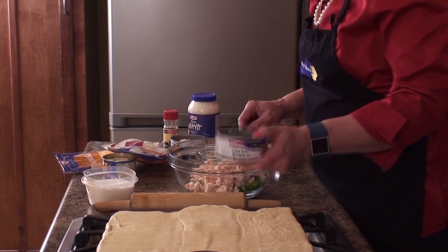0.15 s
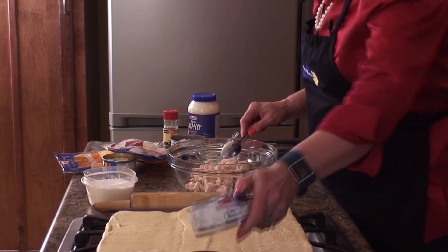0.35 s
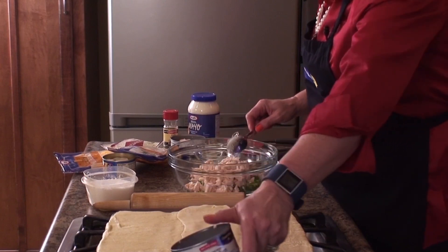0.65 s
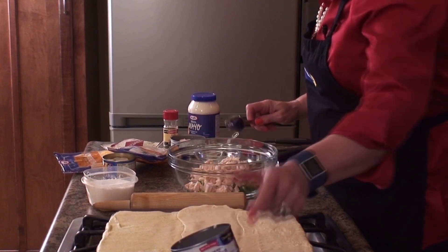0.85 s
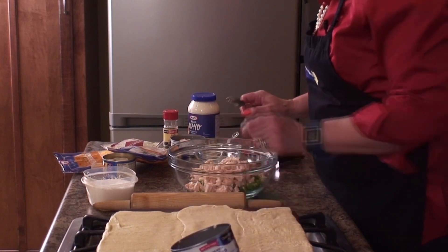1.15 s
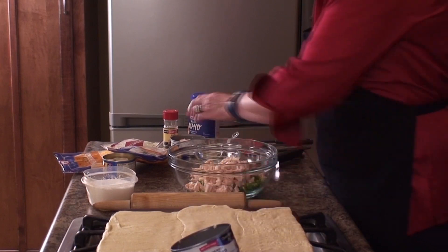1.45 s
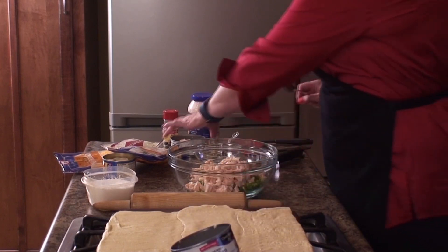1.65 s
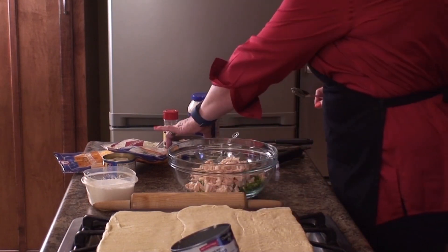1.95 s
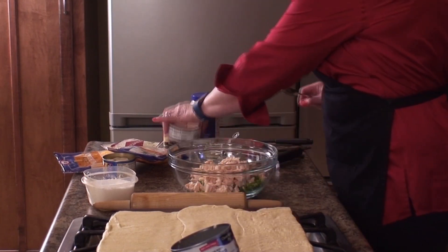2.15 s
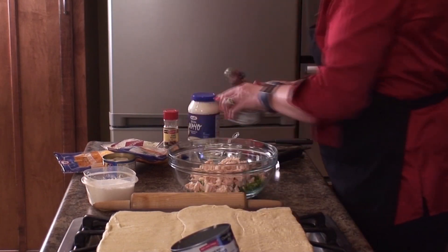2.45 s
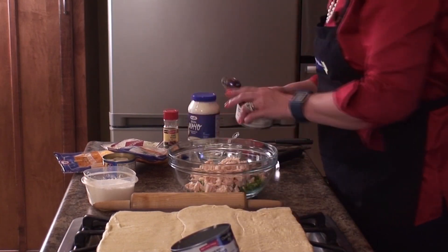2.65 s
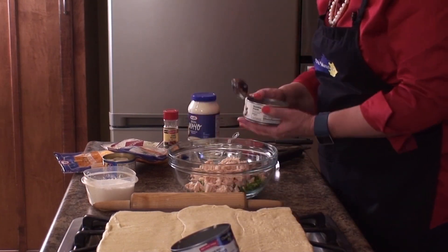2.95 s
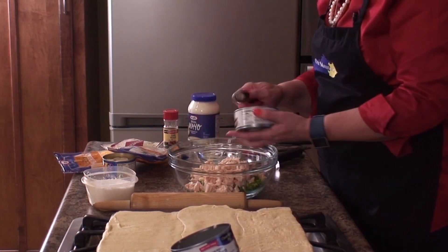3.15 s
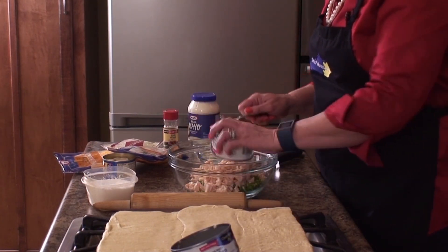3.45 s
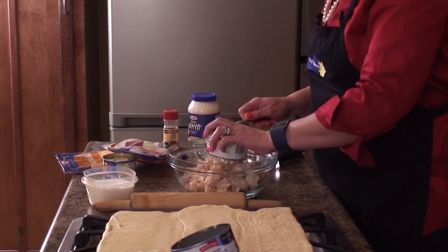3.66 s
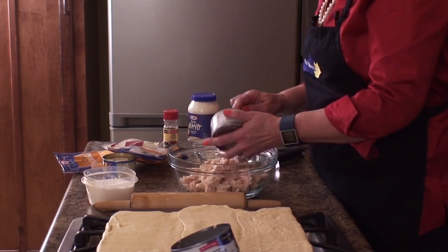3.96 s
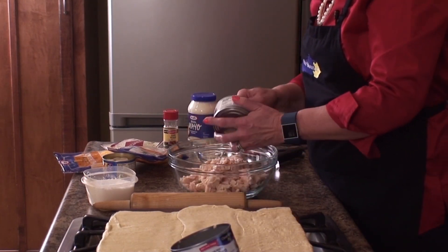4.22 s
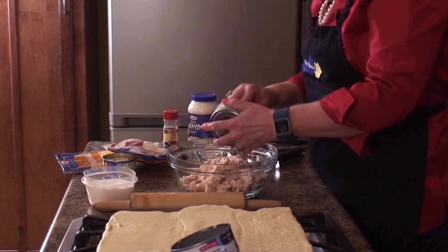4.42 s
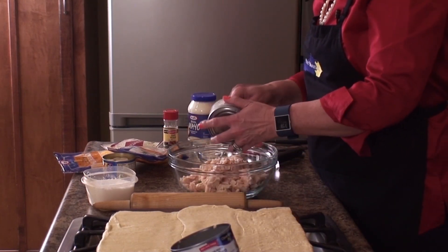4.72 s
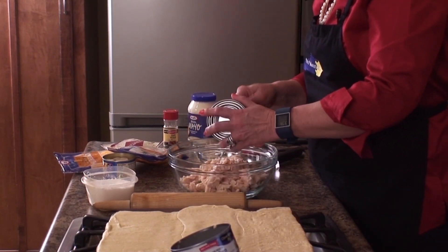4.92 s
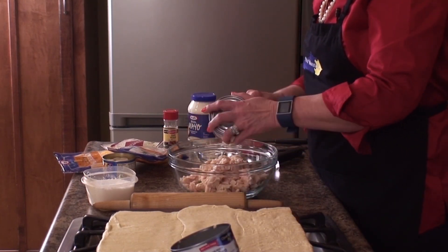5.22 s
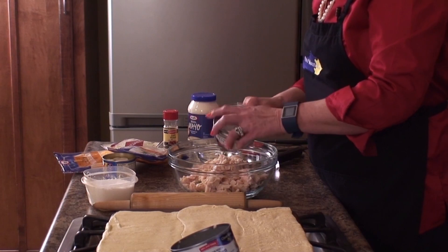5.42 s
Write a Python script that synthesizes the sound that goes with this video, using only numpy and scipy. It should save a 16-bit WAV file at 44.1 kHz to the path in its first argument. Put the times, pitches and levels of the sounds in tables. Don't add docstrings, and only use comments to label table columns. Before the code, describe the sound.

A quiet home kitchen, low unsteady fridge hum and rumble, microphone an arm's length from a stone counter. Barely audible handling ticks and a soft bump come first. At 0.57 s an empty tin is laid down, rocks on its rim in quick uneven clanks until 0.77 s, and leaves a thin fading ring. Dull body bumps against the cupboard occur around 1.35 to 1.65 s, with sleeves rustling from 1.5 s. At 2.0 s a small steel piece drops, bouncing and skidding with high clear pings and counter thuds until 2.2 s, as fabric swishes strongly. Tiny clicks follow. At 3.05 to 3.17 s a spoon gives sharp, dry lid ticks. Near quiet follows until 4.24 s, when the spoon knocks into a full can and scrapes in short gritty strokes. Hard double knock at 4.7 s, more scraping, loud ringing rim knock at 5.02 s with a rub, three knocks around 5.21 to 5.26 s, scraping, and a last knock at 5.5 s.

```python
import sys
import numpy as np
from scipy import signal
from scipy.fft import rfft, irfft, next_fast_len
from scipy.io import wavfile
from scipy.ndimage import uniform_filter1d, map_coordinates

SR = 44100
rng = np.random.default_rng(int(sys.argv[2]) if len(sys.argv) > 2 else 0)


def unload_audio(sound):
    columns = np.transpose(np.atleast_2d(sound))
    steps = np.round(np.clip(columns, -1, 1) * 32767)
    wavfile.write(sys.argv[1], SR, steps.astype(np.int16))


def amplitude_ratio(level_db):
    exponent = np.asarray(level_db, float) / 20
    return 10 ** exponent


N = 246254

CAN_EDGES = [250, 800, 1500, 3200, 16500]
KNOCKS = [
    (4.688, -59, 13),
    (4.7018, -8, -4),
    (4.7117, -12, -1.5),
    (5.498, -16, 1.5),
    (5.515, -32, 3),
]
HELD_CAN = [(410, 3, 0.065), (536, -6.5, 0.13), (692, -1, 0.094), (793, 2.5, 0.054), (990, 12, 0.058),
            (1460, -8, 0.048), (1542, -11.5, 0.17), (2440, 2, 0.035), (2760, -12, 0.028), (3370, 1, 0.03),
            (3680, 1, 0.038), (5910, 4.5, 0.022), (6750, 8.5, 0.0078), (8530, 6, 0.0093)]
HELD_SHARE_DB = (-16.5, -9.5, -16.5, -14)
TURNED_KNOCKS = [
    (5.211, -12.5, 5),
    (5.2328, -7.5, -2.5, -4),
    (5.259, -15, -0.5),
]
TURNED_CAN = [(544, 15, 0.047), (700, 1, 0.049), (982, 4, 0.052), (1790, -8.5, 0.11), (2356, 7.5, 0.04),
              (3040, 4, 0.018), (3350, -5, .03), (3560, -3, 0.074), (4360, 10, 0.01), (4600, -2, 0.042),
              (5063, 12.5, 0.0094), (5880, 6, 0.026), (6160, -1, 0.059), (7960, -8, 0.016)]
TURNED_SHARE_DB = (-12, -10.5, -14, -12.5)
FIRST_KNOCK = [
    (4.2355, -12.5, 1.5),
]
FULL_CAN = [(415, 0, .06), (1001, 6, .05), (1340, -1, .04), (1523, -1, .05), (2417, 1, .05), (2616, 0, .04),
            (3838, 3, .04), (5146, 0, .025), (5500, -1, .015), (6100, -3, .015), (6990, -1, .015),
            (7640, -3, .015), (8930, -5, .012)]
FULL_SHARE_DB = (-19, -9.5, -14, -11)
RIM_KNOCKS = [
    (5.0175, -3, -0.93),
    (5.046, -23, 4),
]
CAN_RIM = [(463, 2, 0.053), (1310, -2, 0.05), (1107, 7, 0.036), (1228, 3, 0.058), (1765, 1, 0.045),
           (1900, -1, 0.03), (1685, -1, 0.07), (2590, -7, 0.07), (3460, -2, 0.04), (3740, -4, 0.068),
           (3900, -13, 0.069), (5130, -2, 0.043), (6080, 1, 0.025), (7500, -3, 0.03)]
RIM_SHARE_DB = (-21.5, -7, -10, -17.5)


def spoon_knocks():
    knocks = struck(KNOCKS, HELD_CAN, HELD_SHARE_DB, CAN_EDGES, crack_db=-1.5, crack_s=0.021,
                    scatter_db=3.0, regrip=0.068, rise=2.0)
    knocks += struck(TURNED_KNOCKS, TURNED_CAN, TURNED_SHARE_DB, CAN_EDGES, crack_db=-3.5, crack_s=0.019,
                     scatter_db=1.0, regrip=0.38, rise=1.25)
    knocks += struck(FIRST_KNOCK, FULL_CAN, FULL_SHARE_DB, CAN_EDGES, crack_db=-.6, crack_s=.015,
                     scatter_db=0, regrip=0, rise=1.5)
    knocks += struck(RIM_KNOCKS, CAN_RIM, RIM_SHARE_DB, CAN_EDGES, crack_db=-7.0, crack_s=0.035,
                     scatter_db=1.5, regrip=.1, rise=1.0)
    return knocks


# start t/s, hold t/s, pressure level/dB, bright rasp over low ring level/dB
SCRAPE = [(4.24, 0.016, -40, -5), (4.268, 0.04, -42, -1.5), (4.325, .03, -47, -9),
          (4.352, 0.048, -38.5, .1), (4.4, 0.066, -38.5, -1.5), (4.484, 0.018, -57, 16),
          (4.521, 0.024, -54, 22), (4.545, .024, -55, 17), (4.57, 0.05, -55.5, 9), (4.72, 0.07, -39, -11),
          (4.775, .025, -46, 1.5), (4.797, 0.045, -37.5, 3.5), (4.845, 0.035, -41, 6.5),
          (4.88, .026, -50, 9), (5.24, 0.058, -34.5, .6), (5.295, .045, -42, -4), (5.335, 0.045, -44.5, .6),
          (5.5, 0.03, -33, -8)]
RIM_RUB = [
    (5.04, 0.034, -31, -20),
    (5.085, 0.097, -41, -24),
]
RASPED_WALL = [(2420, 2, .035), (2660, 1, .025), (3700, 1, .025), (3880, -1, .03), (5000, 0, .015),
               (5330, 2, .015), (5900, 1, .015), (6280, 2, .015), (6780, 3, .012), (7190, 1, .015),
               (8200, 2, .009), (9050, 1, .009), (10500, 0, .006), (11700, -1, .006)]
# f/Hz, level/dB per Hz
RASP = [(1060, -42), (1800, -7), (1900, -13), (2380, 2.5), (3170, -4.5), (4380, -5), (6500, .6),
        (12700, -6.5), (15900, -9), (16500, -44)]


def spoon_scrapes():
    low, bright = strokes(SCRAPE, bright_lift_db=1100)
    rough = amplitude_ratio(2.2 * wobble(90)) * rng.standard_normal(N)
    rasp = filtered(rough, resonances(RASPED_WALL, 2000, 12000, 1.1)) + 1.15 * grit(RASP, 2.6, 300)
    body = filtered(rough, resonances(HELD_CAN, 300, 2000, 0.71))
    scrape = low * patchy(body, 2.9) + bright * patchy(rasp, 4.2)
    low, bright = strokes(RIM_RUB)
    scrape += low * filtered(rough, resonances(CAN_RIM, 300, 2000, 0.6))
    scrape += bright * filtered(rough, resonances(CAN_RIM, 2000, 9000, 0.7))
    return scrape


# middle t/s,
# level/dB, f/Hz, length/s
CATCHES = [(0.669, -31.5, 3480, .012), (.615, -39, 1233, .03), (1.9, -57, 1250, .04),
           (3.0875, -34, 3500, .004), (3.132, -46, 5000, .003), (4.29, -44, 1000, .022),
           (4.29, -52, 1600, .02), (4.292, -45, 4900, .01), (4.293, -46, 3680, .015),
           (4.36, -41, 960, .016), (4.382, -40, 3620, .013), (4.38, -44, 2600, .01),
           (4.425, -43, 990, .012), (4.45, -46, 3780, .01), (4.53, -39, 2330, .008),
           (4.555, -44, 2400, .02), (5.04, -33, 1680, .014), (5.066, -40, 2590, .016),
           (5.105, -39, 1280, .016), (5.085, -43, 1760, .014), (4.992, -66, 4900, .05),
           (0.68, -35.5, 5938, 0.014), (.762, -24.5, 815, .025), (4.7105, -12, 993, .0105),
           (4.716, -26, 420, .015), (5.511, -30, 409, 0.022), (4.385, -41, 1574, 0.029),
           (4.314, -59, 3840, 0.02), (4.443, -48, 1360, .05), (4.452, -38.5, 5400, 0.013),
           (4.457, -38, 940, 0.014), (4.822, -43.5, 1770, 0.032), (4.822, -40.5, 3900, 0.018),
           (4.814, -42, 5400, .02), (4.818, -42, 5700, 0.034), (4.872, -42, 4430, 0.029),
           (4.873, -38.5, 2870, 0.012), (5.244, -37.5, 4390, 0.035)]


def catches():
    out = np.zeros(N)
    for s, db, hz, length in CATCHES:
        t = np.arange(int(2 * length * SR)) / SR
        drift = np.cumsum(rng.standard_normal(len(t))) * 0.038 * hz / 1500
        swell = np.sin(np.pi * t / (2 * length)) ** 2
        add(out, s - length, amplitude_ratio(db) * swell * np.sin(2 * np.pi * hz * t + drift))
    return out


def can_cavity():
    open_s, covered_s, turn_s = 2.85, 4.27, .1
    turns = [open_s, open_s + turn_s, covered_s - turn_s, covered_s]
    facing = np.interp(np.arange(N) / SR, turns, [0, 1, 1, 0])
    mode = resonances([(1016, 0, 0.26)], 0, 2000, 0.66)
    return amplitude_ratio(-71) * facing * filtered(rng.standard_normal(N), mode)


def spoon_in_can():
    return amplitude_ratio(-6.5) * spoon_scrapes() + catches() + spoon_knocks() + can_cavity()


LID_TICKS = [
    (3.0543, -1.5, 1.25),
    (3.0585, -14, -1.5),
    (3.0842, -7.5, -1.6),
    (3.1212, -17.5, -1.8),
]
LID = [(596, 0, .01), (980, -13.5, 0.015), (1683, -3, 0.018), (2600, -10, 0.01), (2940, 7, 0.01),
       (3405, -2, 0.012), (3630, 3, 0.011), (4050, 3.5, 0.008), (4650, 1.5, .005), (5940, 3, 0.0087)]
LID_SHARE_DB = (-42.5, -29.5, -20, -7)
TIP_TICKS = [
    (3.1684, -11.5, 0.31),
    (3.197, -49.5, -0.89),
]
SPOON_TIP = [(740, 0, 0.012), (1340, 0, 0.0091), (2750, 0, 0.006), (3950, 0, 0.007), (4700, -4, .005),
             (7000, -4, .004), (10940, -3, 0.0042)]
TIP_SHARE_DB = (-20, -13, -15, -11.5)


def spoon_on_lid():
    ticks = struck(LID_TICKS, LID, LID_SHARE_DB, CAN_EDGES, crack_db=-5, crack_s=0.0042,
                   scatter_db=0, regrip=.1, rise=0.77)
    tip = struck(TIP_TICKS, SPOON_TIP, TIP_SHARE_DB, CAN_EDGES, crack_db=3.5, crack_s=0.0053,
                 scatter_db=3, regrip=.1, rise=0.27)
    return amplitude_ratio(-1.5) * ticks + amplitude_ratio(-1) * tip


BOUNCES = [
    (1.8607, -55.5, -2, .1),
    (1.8993, -52.5, -2.5, .1),
    (1.998, -6.5, -1.5, .1),
    (2.0101, -14.5, -2, 1.5),
    (2.051, -17, -2, -.1),
    (2.0788, -12.5, .1, -8),
    (2.1194, -16, 0.4, -11),
    (2.1476, -21, 0.4, .1),
    (2.1634, -20.5, -1.5, .1),
    (2.1886, -33, 4, 12),
]
STEEL_HZ = [4103, 5426, 6489, 7381, 8865, 10540, 11290, 12508, 12820, 15162]
# level/dB, t60/s
STEEL_RING = [(0, 0.2), (0, 0.25), (-3.5, 0.41), (0, 0.39), (2, 0.3), (-17, .2), (2.5, 0.16), (-7.5, 0.31),
              (-13, .2), (-10, .15)]
STEEL_EDGES = [3500, 4700, 6000, 8000, 16500]
STEEL_SHARE_DB = (-17, -8.5, -19.5, -12.5)
THUDS = [
    (1.997, -15, 7),
    (2.01, -12.5, -0.5),
    (2.051, -19, -5),
    (2.075, -17, -2.5),
    (2.112, -13, -5.5),
    (2.118, -18, -3),
    (2.164, -27.5, 14),
]
COUNTER = [(448, -2, 0.012), (656, 4.5, 0.039), (1099, 0.5, 0.0201), (1370, 2, 0.027), (2227, 1, .02),
           (2580, -2.5, .02)]
THUD_EDGES = [150, 1300, 3600]
COUNTER_SHARE_DB = (-13, -9)
SLIDE = [
    (1.7, 0.25, -51, -8.5),
    (1.998, 0.0068, -28, -16),
    (2.015, 0.12, -36.5, 2),
    (2.108, 0.013, -23.5, -4.5),
    (2.135, 0.072, -44, 7),
]
# f/Hz, level/dB per Hz
STONE = [(71, -41.5), (120, -11.5), (362, -6), (443, -7.5), (662, -6), (844, -9), (1520, -3.5), (3700, -10),
         (5200, -21), (16000, -36)]


def steel_piece():
    low, high = strokes(SLIDE)
    skid = grit(STONE, 1.0, 150)
    skid = low * filtered(skid, lambda hz: hz < 1300) + high * filtered(skid, lambda hz: hz > 1300)
    thuds = struck(THUDS, COUNTER, COUNTER_SHARE_DB, THUD_EDGES, crack_db=5.0, crack_s=0.011,
                   scatter_db=4.5, regrip=.1, rise=1.0)
    modes = np.column_stack([STEEL_HZ, STEEL_RING])
    ring = struck(BOUNCES, modes, STEEL_SHARE_DB, STEEL_EDGES, crack_db=-9.5, crack_s=.006,
                  scatter_db=2.0, regrip=0.94, rise=4.5, in_step=True)
    return amplitude_ratio(-4) * skid + thuds + ring


LANDING = [
    (.569, -16.5, 0.5),
]
FLAT_CAN = [(420, 2, .1), (512, 0, .06), (790, -4, .06), (1250, 2, .12), (1880, -5, .06), (2347, 2, .12),
            (2440, -4, .06), (2690, -5, .05), (2850, -1, .05), (3300, 0, .05), (3640, -1, .08),
            (4750, -1, .03), (5216, -3, .04), (5717, -2, .08)]
FLAT_SHARE_DB = (-13, -14.5, -10, -14.5)
ROCK = [
    (.612, -24, -7),
    (.641, -35, 3),
    (.659, -19, 4.5),
    (.711, -23, 2.5),
    (.724, -19, -4),
    (.747, -17.5, -4),
    (.754, -25, 2.5),
    (.769, -23, -6),
]
EMPTY_CAN = [(450, 2.5, 0.064), (812, 1, 0.1), (874, -0.5, 0.084), (1060, 3, 0.044), (1221, 2.5, 0.12),
             (1397, -8, 0.2), (1640, -8, 0.085), (2070, -11, 0.59), (2330, 2, 0.099), (3480, 0, 0.058),
             (3650, 3, 0.061), (4670, -16, 0.11), (5600, -4, .04), (5980, -10, 0.054)]
EMPTY_SHARE_DB = (-19, -11, -15.5, -19.5)
SETTLING = [
    (.712, -31, .1),
    (.755, -29, .1),
]
FREE_CAN = [(441, 0, .35), (797, 4, .2), (1217, 0, .3), (1410, -5, .3), (1653, -2, .15), (2062, 0, .55),
            (2288, 1, .35), (2503, -9, .5), (2961, -5, .4), (3628, 0, .35), (4064, -5, .35),
            (5222, -4, .25), (5943, -4, .3)]
FREE_SHARE_DB = (-14, -18, -16, -21)
ROLL = [
    (.57, 0.08, -32.5, -9),
    (.657, 0.028, -30, -7.5),
    (.68, 0.035, -28, -16),
    (.72, 0.034, -30.5, -9.5),
    (.77, 0.067, -36.5, -27),
]


def empty_can():
    low, bright = strokes(ROLL)
    rough = amplitude_ratio(3.4 * wobble(120)) * rng.standard_normal(N)
    roll = low * filtered(rough, resonances(EMPTY_CAN, 0, 1500, 1.46))
    roll += bright * filtered(rough, resonances(EMPTY_CAN, 1500, 9000, 4.3))
    landing = struck(LANDING, FLAT_CAN, FLAT_SHARE_DB, CAN_EDGES, crack_db=-.6, crack_s=.025,
                     scatter_db=0, regrip=0, rise=.8)
    settling = struck(SETTLING, FREE_CAN, FREE_SHARE_DB, CAN_EDGES, crack_db=-20, crack_s=.01,
                      scatter_db=2.5, regrip=.3, rise=1.5)
    rocking = struck(ROCK, EMPTY_CAN, EMPTY_SHARE_DB, CAN_EDGES, crack_db=5.5, crack_s=0.032,
                     scatter_db=1.6, regrip=0.69, rise=0.83)
    return landing + settling + amplitude_ratio(-6) * roll + rocking


# t/s, level/dB (peak), f/Hz
TICKS = [(0.2735, -54, 900), (0.2738, -40.5, 14300), (0.4144, -57, 5950), (1.861, -39, 700),
         (2.672, -44, 1100), (2.727, -38.5, 12500), (2.743, -46, 11300), (2.8508, -37.5, 6900),
         (3.2977, -53.5, 8000), (3.659, -57, 4900), (3.7893, -60, 6160), (3.8452, -52, 5820),
         (4.688, -42, 9500), (5.432, -52, 10500)]
# t/s, level/dB
# (peak), f/Hz
BUMPS = [(0.277, -30.5, 300), (0.569, -31, 162), (0.721, -27, 163), (0.752, -29, 285), (1.336, -35.5, 106),
         (1.358, -26.5, 194), (1.409, -42, 56.5), (1.505, -43, 192.8), (1.558, -27, 50.8),
         (1.638, -36, 86.3), (1.818, -40, 140), (1.86, -36, 161), (2.467, -37, 113), (3.798, -41, 180.4)]


def handling():
    out, t = np.zeros(N), np.arange(SR // 10) / SR
    for s, db, hz in TICKS:
        add(out, s, amplitude_ratio(db + 5.5 - 60 * t * hz / 13) * np.sin(2 * np.pi * hz * t))
    for s, db, hz in BUMPS:
        soft_start = 1 - np.exp(-t / 0.0016)
        add(out, s, amplitude_ratio(db + 3.5 - 60 * t * hz / 4) * np.sin(2 * np.pi * hz * t) * soft_start)
    return out


# t/s, fabric hiss level/dB
MOVEMENT = [(0, -71.5), (.14, -64), (.22, -68), (.55, -69.5), (.95, -72.5), (1.13, -70.5), (1.388, -65),
            (1.514, -53.5), (1.652, -54), (1.844, -57), (1.98, -70), (2.2, -51), (2.3, -57.5), (2.8, -63),
            (3.06, -71.5), (3.21, -69.5), (3.6, -72.5), (4.2, -76.5)]
# f/Hz, level/dB per Hz
RUMBLE = [(12, -38.5), (20, -2.5), (70, -4), (157, -1.5), (190, -4.5), (245, -4), (321, -14.5), (461, -13),
          (500, -12.5), (650, -54), (1100, -120)]
BODY = [(150, -17), (250, -1.5), (647, -3.5), (718, -5.5), (1070, -7), (2490, -17.5), (4000, -29),
        (5200, -44.5), (8800, -120)]
HISS = [(1180, -28.5), (2000, -2.5), (3680, -6), (5570, -6), (9890, -13), (14800, -14.5), (16100, -16.5),
        (16500, -46)]
# f/Hz, level/dB, t60/s
FRIDGE = [(76, -0.5, 0.74), (163.5, -2.5, 0.79)]


def room_air():
    s, db = np.transpose(MOVEMENT)
    hiss = amplitude_ratio(np.interp(np.arange(N) / SR, s, db))
    rumble = np.hypot(amplitude_ratio(-58), amplitude_ratio(2.5) * hiss)
    body = np.hypot(amplitude_ratio(-63), amplitude_ratio(5) * hiss)
    hum = amplitude_ratio(-61) * filtered(rng.standard_normal(N), resonances(FRIDGE, 0, 300, 0.86))
    return hum + rumble * grit(RUMBLE, 2.7, 12) + body * grit(BODY, 2.22, 30) + hiss * grit(HISS, 1.9, 45)


# f/Hz, t60/s
KITCHEN = [(200, 0.71), (1000, 0.64), (3000, 0.55), (8000, 0.45), (15000, 0.12)]


def kitchen(x):
    out, step = np.zeros(N), int(.3 * SR)
    for at in range(0, N, step):
        hz, t, z = signal.stft(rng.standard_normal(SR // 2), SR, nperseg=256)
        decay = amplitude_ratio(-60 * t / along(KITCHEN, hz)[:, None])
        tail = signal.istft(z * decay, SR, nperseg=256)[1]
        add(out, at / SR + .006, signal.fftconvolve(x[at:at + step], tail / np.linalg.norm(tail)))
    return out


def struck(blows, modes, usual_db, edges, crack_db, crack_s, scatter_db, regrip, rise, in_step=False):
    out, t = np.zeros(N), np.arange(SR // 2) / SR
    hz, level, t60 = np.transpose(modes)[:, :, None]
    group = np.searchsorted(edges, hz[:, 0]) - 1
    power = np.bincount(group, amplitude_ratio(2 * level[:, 0]))
    tilt = np.arange(len(usual_db)) - (len(usual_db) - 1.5) / 2
    for (s, db, hard_db, *low_db), (after, *_) in zip(blows, [*blows[1:], (99,)]):
        share_db = usual_db + hard_db * tilt
        share_db[0] += sum(low_db)
        phase = 2 * np.pi * hz * t
        if in_step:
            slip = .7 * rng.standard_normal(hz.shape)
            phase = phase + 2 * np.pi * hz * round(s * SR) / SR + slip
        decay = amplitude_ratio(level + scatter_db * rng.standard_normal(hz.shape) - 60 * t / t60)
        ring = decay * np.sin(phase) * (1 - np.exp(-t * hz / rise))
        ring = (ring * (amplitude_ratio(share_db) / np.sqrt(power))[group, None]).sum(0)
        ring *= np.clip((after - s - t) / 0.0017 + 1, 1 - regrip, 1)
        fade = amplitude_ratio(-60 * t / crack_s) + 0.13 * amplitude_ratio(-60 * t / (8 * crack_s))
        add(out, s, amplitude_ratio(db) * (ring + amplitude_ratio(crack_db) * crack_noise(edges, share_db, len(t)) * fade))
    return out


def crack_noise(edges, share_db, length):
    noise = rfft(rng.standard_normal(length))
    f = np.fft.rfftfreq(length, 1 / SR)
    density = [(np.sqrt(a * b), d - 10 * np.log10((b - a) * 2 / SR))
               for a, b, d in zip(edges, edges[1:], share_db)]
    colour_db = along(density, f) - 2.1 * np.clip(f / 1000 - 8, 0, None)
    band = (f > edges[0]) * f / (f + 1500) / (1 + (f / edges[-1]) ** 4)
    return irfft(noise * amplitude_ratio(colour_db) * band)


def strokes(rows, bright_lift_db=380):
    low, bright = np.zeros(N), np.zeros(N)
    for s, hold, db, bright_db in rows:
        t = np.arange(int((hold + .4) * SR)) / SR
        press = np.clip(t / .008, 0, 1) * amplitude_ratio(db)
        gone = np.clip(t - hold, 0, None)
        add(low, s, (press * amplitude_ratio(-380 * gone)) ** 2)
        add(bright, s, (press * amplitude_ratio(bright_db - bright_lift_db * gone)) ** 2)
    return np.sqrt(low), np.sqrt(bright)


def resonances(modes, lo, hi, widen):
    def response(f):
        total = 0
        for k, (hz, db, t60) in enumerate(modes):
            if lo < hz < hi:
                width = widen * np.log(1000) / np.pi / t60
                peak = 1j * f * np.sqrt(width) / (hz * hz - f * f + 1j * f * width)
                total = total + (-1) ** k * amplitude_ratio(db) * peak
        return total
    return response


def grit(spectrum, lump_db, rate):
    lumps = amplitude_ratio(lump_db * wobble(rate)) * rng.standard_normal(N)
    return filtered(lumps, lambda hz: amplitude_ratio(along(spectrum, hz)))


def patchy(x, depth_db):
    z = signal.stft(x, nperseg=512)[2]
    field = uniform_filter1d(rng.standard_normal(z.shape), size=2, axis=0)
    field = uniform_filter1d(field, size=4, axis=1)
    return unit(signal.istft(z * amplitude_ratio(depth_db * unit(field)), nperseg=512)[1][:len(x)])


def wobble(rate):
    knots = rng.standard_normal(int(N * rate / SR) + 4)
    return map_coordinates(knots, [np.arange(N) * rate / SR])


def filtered(x, response):
    m = next_fast_len(len(x) + 8192)
    return unit(irfft(rfft(x, m) * response(np.fft.rfftfreq(m, 1 / SR)), m)[:len(x)])


def unit(x):
    return x / np.sqrt(np.mean(x ** 2) + 1e-20)


def along(points, hz):
    f, v = np.transpose(points)
    return np.interp(np.log(hz + 1), np.log(f + 1), v)


def add(out, s, sound):
    at = round(s * SR)
    out[at:at + len(sound)] += sound[:len(out) - at]


def scene():
    hand, lid = spoon_in_can() + handling(), spoon_on_lid()
    steel, tin = steel_piece(), empty_can()
    wet = kitchen(amplitude_ratio(-10.5) * tin + amplitude_ratio(-18) * steel + amplitude_ratio(-16) * hand + amplitude_ratio(-19.5) * lid)
    return (tin + steel + hand + lid + wet + room_air())[None]


def roll_off(x):
    return signal.sosfilt(signal.butter(12, 16850, fs=SR, output="sos"), x)


# f/Hz, level/dB
MIC = [(200, 0), (9000, 1), (15000, 2.5), (15900, -2), (16300, -28), (22050, -62)]


def record(dry):
    m = next_fast_len(N)
    response = amplitude_ratio(along(MIC, np.fft.rfftfreq(m, 1 / SR)))
    heard = irfft(rfft(dry, m) * response, m)[:, :N]
    return roll_off(heard)


dry = scene()
out = record(dry)
unload_audio(out)
```